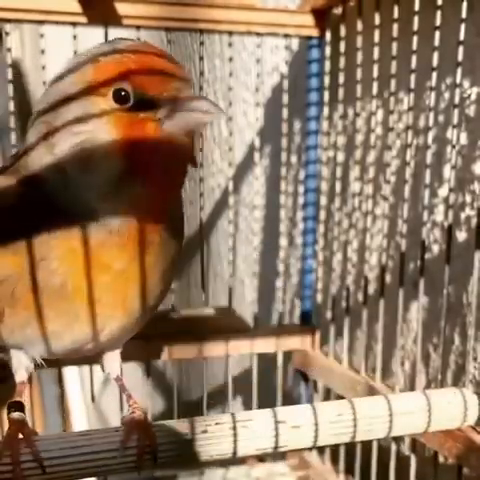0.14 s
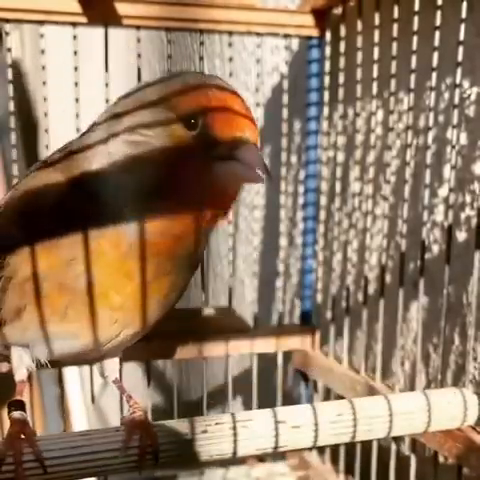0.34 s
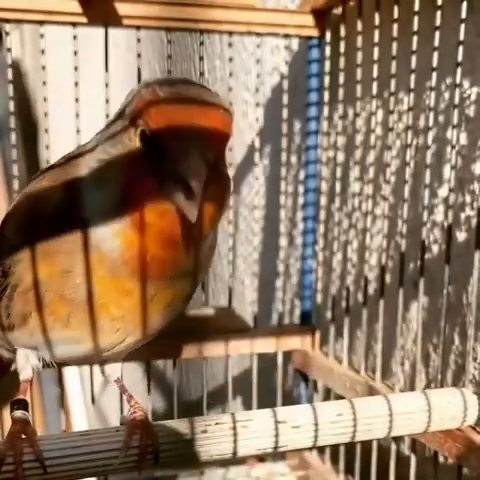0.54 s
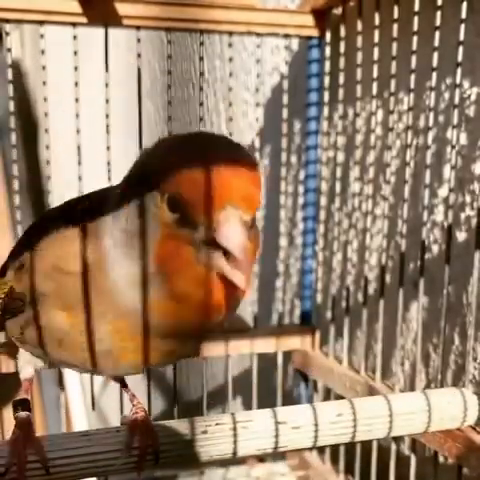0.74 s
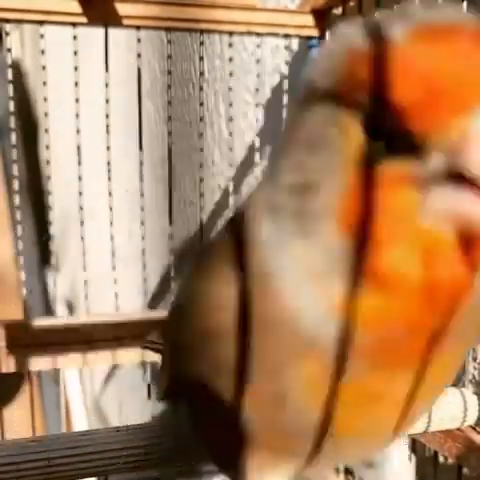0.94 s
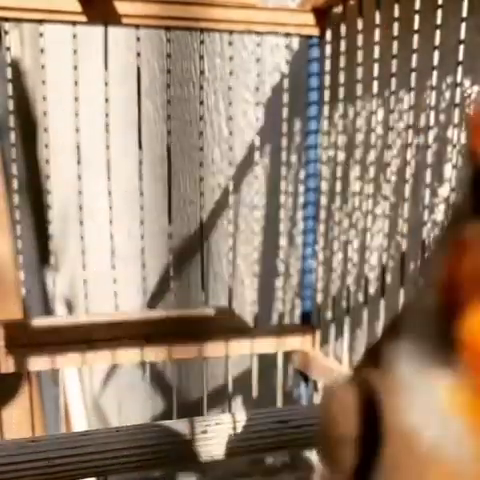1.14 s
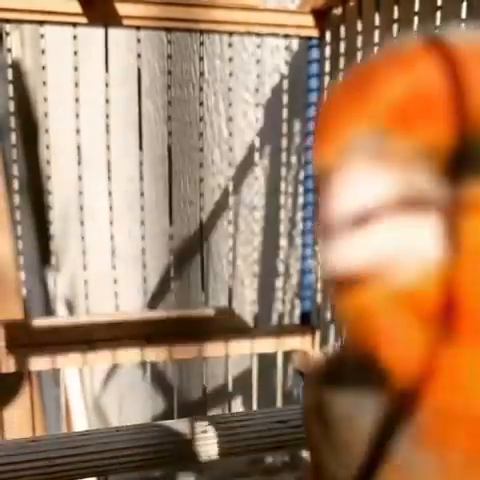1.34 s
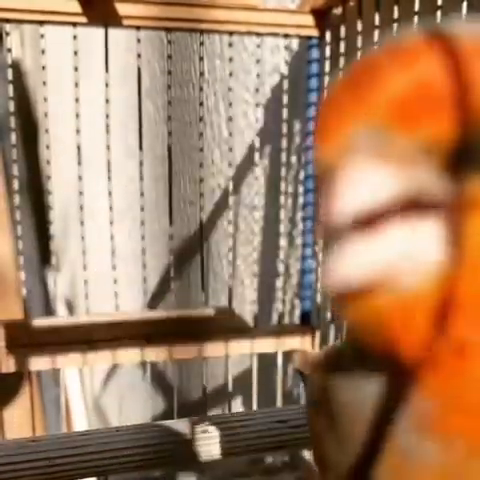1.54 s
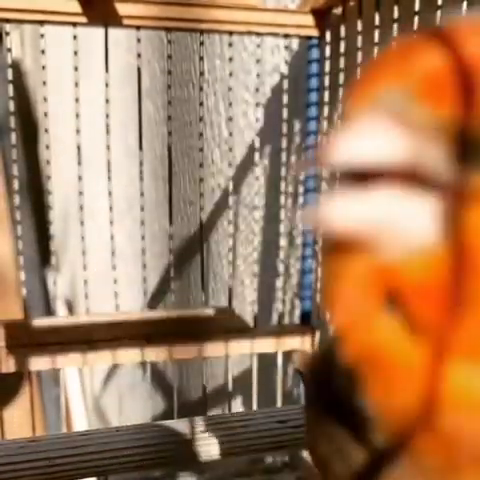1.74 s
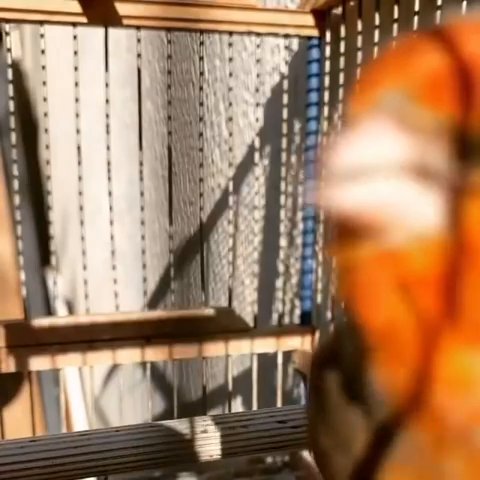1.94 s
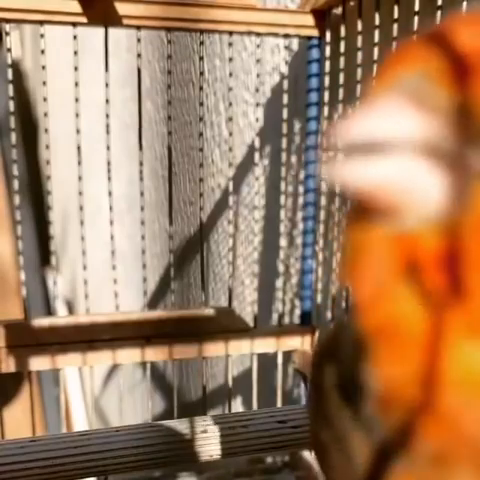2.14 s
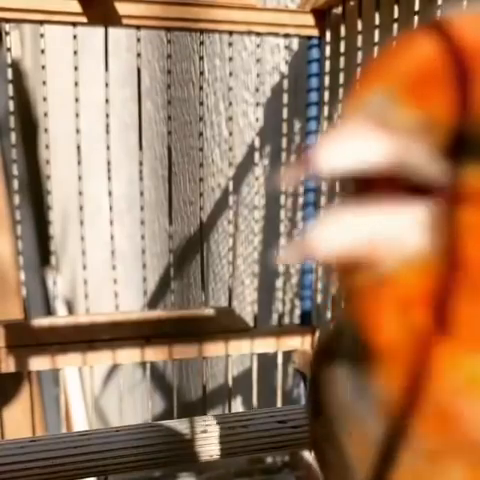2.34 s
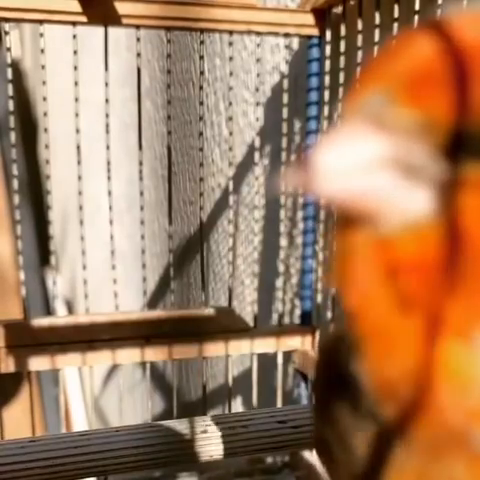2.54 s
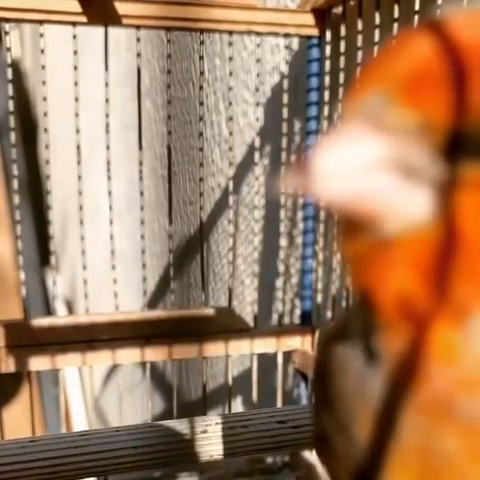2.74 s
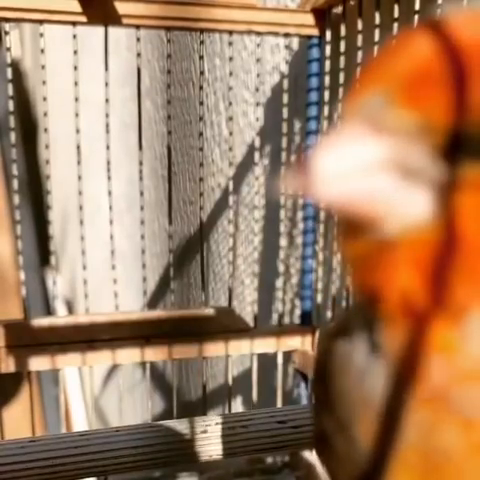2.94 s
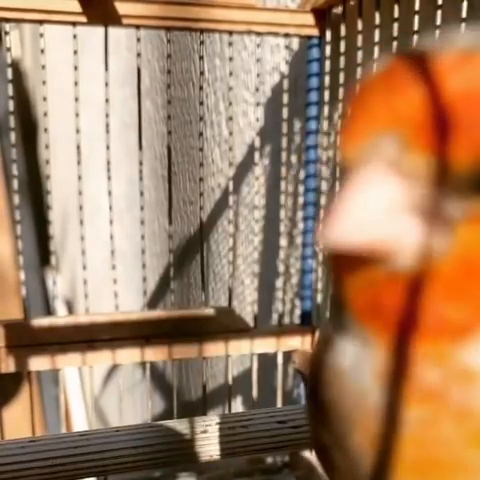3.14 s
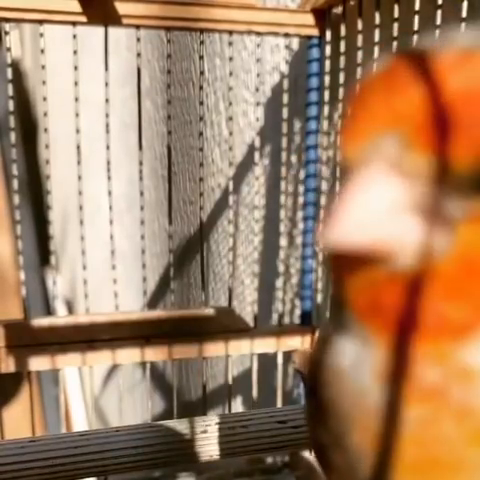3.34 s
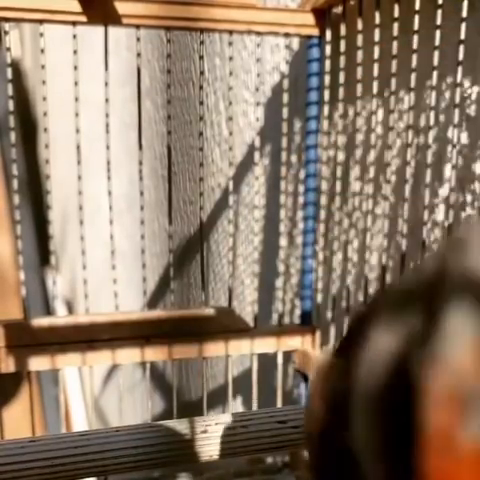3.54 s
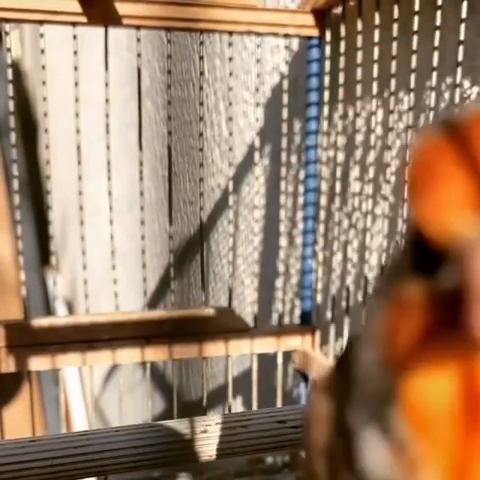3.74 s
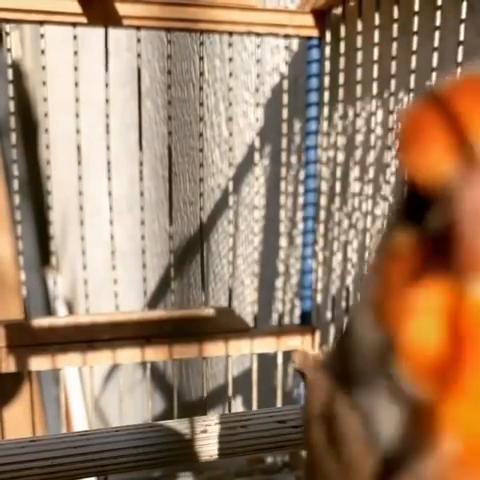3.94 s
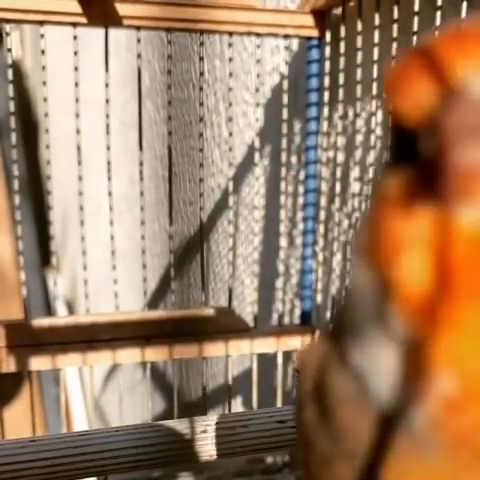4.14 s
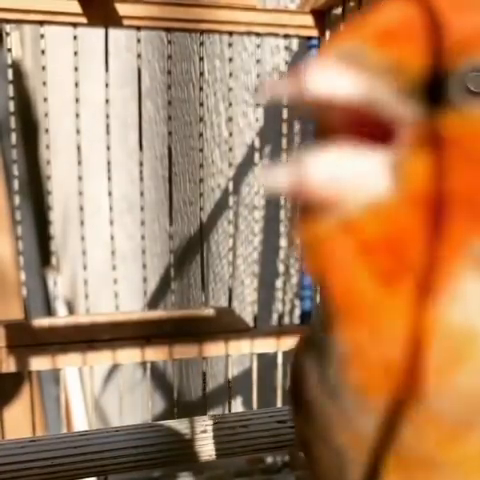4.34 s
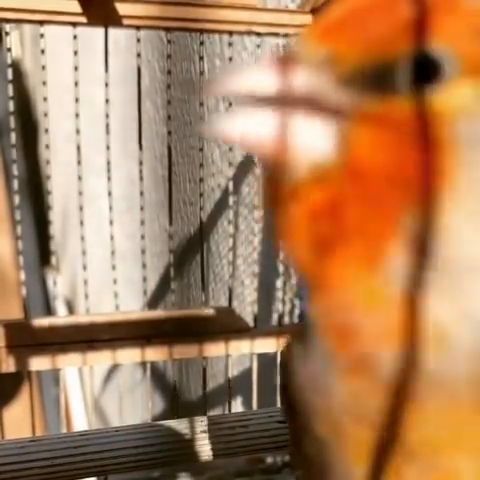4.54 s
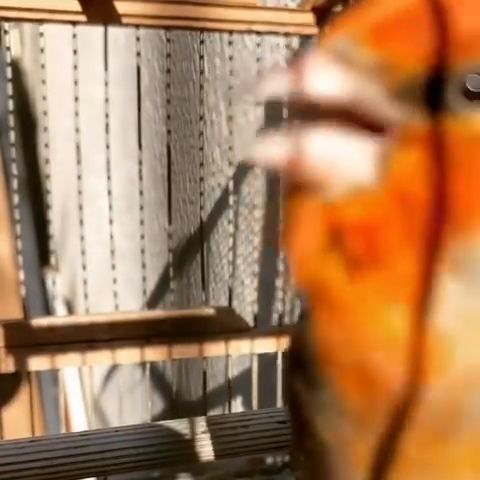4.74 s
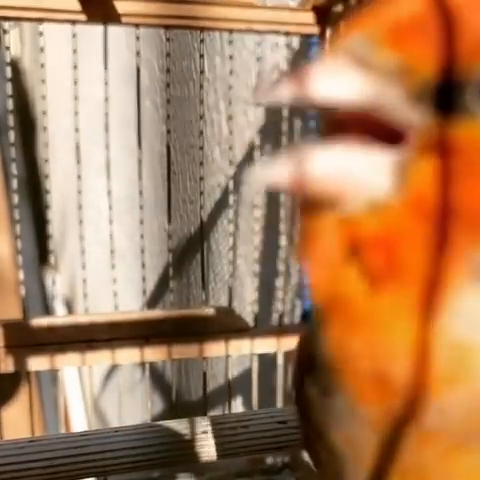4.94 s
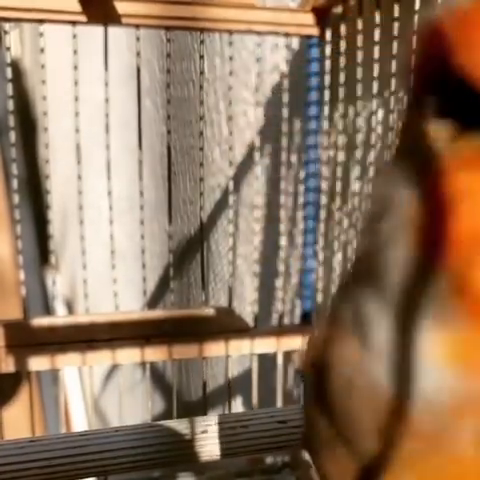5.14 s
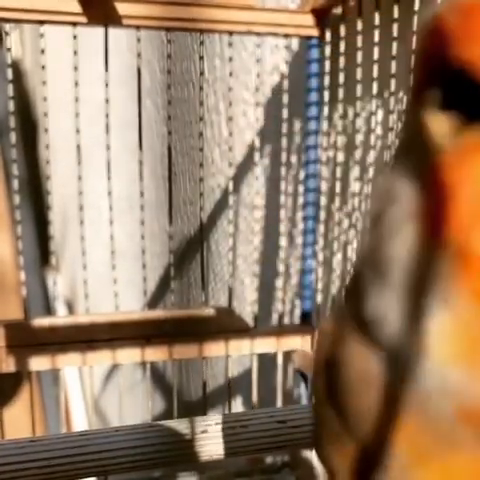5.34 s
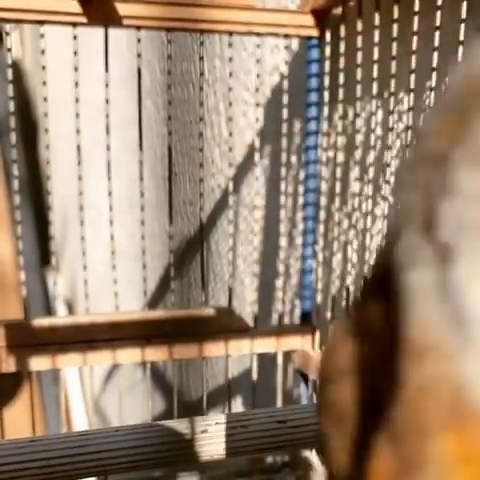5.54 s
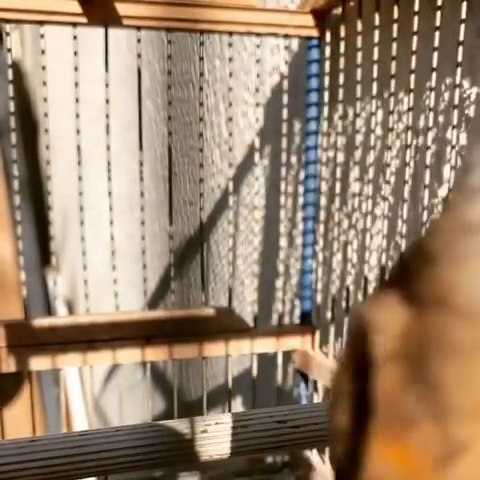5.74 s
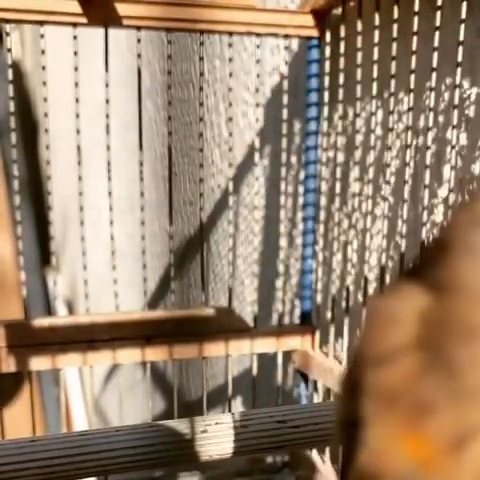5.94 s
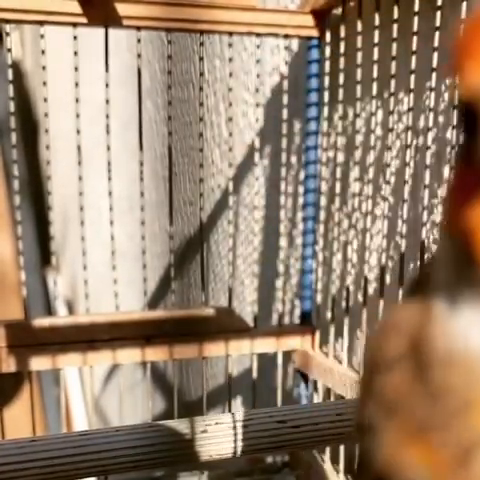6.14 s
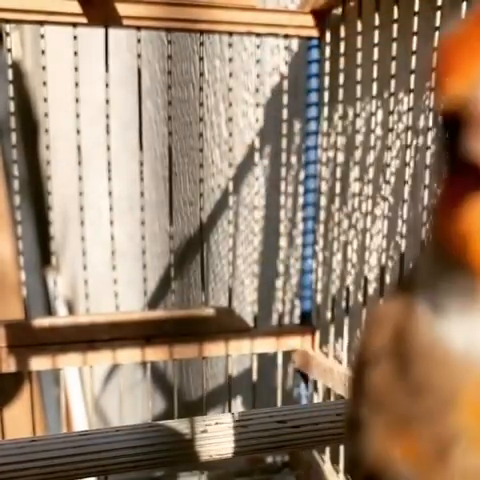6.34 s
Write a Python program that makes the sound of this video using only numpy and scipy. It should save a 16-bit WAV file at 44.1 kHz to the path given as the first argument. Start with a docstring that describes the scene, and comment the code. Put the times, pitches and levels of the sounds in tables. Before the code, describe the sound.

Two bursts of bright, high finch song, close and fairly dry with slight reflections. One begins at once with piping chirps and sliding whistles, then turns buzzy, raspy and squeaky before stopping. A gap leaves low air rumble and a thin distant bird whistle. The second starts with whistled chirps, quickens into a tight trill of about eight syllables, and ends in a dry rattling buzz. A far hoarse call closes.

```python
"""Outdoors, a small finch sings two phrases close to a phone, over a low rumble and a faint rustle.
Clear notes are near-sine voices on drawn pitch and level paths, with weak overtones and breath noise.
Buzzes throb in level and pitch; a harsh rasp stacks overtones in noise; a fast trill repeats three elements.
Far birds call faintly with more echo. Song and calls reach two microphone ports with a phase lead on the left."""
import sys
import numpy as np
from scipy import signal
from scipy.fft import rfft, irfft, next_fast_len
from scipy.io import wavfile
from scipy.ndimage import uniform_filter1d

SR = 44100
rng = np.random.default_rng(int(sys.argv[2]) if len(sys.argv) > 2 else 0)


def materialize(psi):
    """Save the field psi as 16-bit PCM at rate SR to the path in sys.argv[1].

    A 1-D psi becomes a single channel; in a 2-D psi each row is a channel.
    """
    bounded = np.clip(np.atleast_2d(psi).T, -1, 1)
    quanta = np.round(bounded * 32767).astype(np.int16)
    wavfile.write(sys.argv[1], SR, quanta)


N = 282240

# Outdoor noise spectrum. Each row: frequency in Hz, relative density in dB per Hz.
AIR_SPECTRUM = [(25, -24), (68, -4.5), (130, -20), (385, -25), (1200, -26.5), (2300, -34.5), (3000, -36.5),
                (14000, -54.5)]
# Slow course of the outdoor noise. Each row: time in seconds, rumble level in dB, rustle level in dB.
AIR_LEVELS = [(0, -63, -60.5), (0.899, -59.5, -69), (1.399, -73, -75), (3.7, -63, -74.5), (4.5, -70, -73.5),
              (6.4, -68.5, -76)]
# Likeness of outdoor noise at the ports. Each row: frequency in Hz, left-right correlation from -1 to 1.
AIR_LIKENESS = [(140, 1), (210, 0.79), (600, -0.5), (1300, -0.069)]
# Phase between the ports. Each row: frequency in Hz, left lead in radians.
PORT_LEAD = [(1300, .6), (2300, 1.5), (3790, 1.553), (6370, 6.01), (13900, 15.99)]

# Third and fourth partials. Each row: partial frequency in Hz, level re the tone in dB, before tilt and gape.
BEAK = [(5000, -42), (7500, -37.5), (10500, -21.5), (13000, -29.5)]
# Windpipe resonance on second partials. Each row: partial frequency in Hz, gain in dB at full strength.
WINDPIPE = [(6000, -28), (6650, -24), (7100, 7), (7500, -8), (11300, -9), (12500, -24)]
# Breath noise spectrum. Each row: frequency in Hz, relative level in dB.
BREATH_SPECTRUM = [(400, -22.5), (1500, -15), (3500, -1.5), (5300, -1.5), (7300, -4), (8900, 4),
                   (10500, 11), (13500, -20)]

# Note shapes. Each row: share of the note's length, offset from its pitch in Hz, offset from its level in dB.
# Note lists. Each row: start in seconds, length in seconds, pitch in Hz, level in dB,
# second partial in dB before the windpipe.
# Quick rise, a catch, a weak tail:
CHIRP = [(0, -450, -28.5), (.15, -230, -11.5), (.32, -10.5, 0), (.47, 119.5, -3), (.56, 313.5, -31),
         (.67, 225.5, -13), (1, 148, -31.5)]
CHIRP_NOTES = [(0.009, 0.048, 3554, -14.5, -30.5), (0.32, 0.051, 3520, -12, -40),
               (3.835, .042, 3552, -10.5, -42), (4.046, 0.047, 3550, -11, -61.5)]
# Rises, then keeps near its pitch while fading:
SCOOP = [(0, -700, -26.5), (.17, -280, -4.5), (.32, 7, -1.5), (.5, 155.5, -8), (.75, 78, -10),
         (1, 197.5, -32.5)]
SCOOP_NOTES = [(4.287, .037, 3573, -9, -52.5), (4.532, 0.032, 3618, -9.5, -47.5),
               (4.773, .036, 3590, -12.5, -77.5)]
# Low note between trill syllables:
LOW = [(0, -450, -19.5), (.15, -160, -5.5), (.32, -4, 0), (.62, 47, -9.5), (.75, 89, -7.5), (.9, 61.5, -13),
       (1, -40, -23)]
LOW_NOTES = [(4.958, 0.047, 3535, -16.5, -49.5), (5.077, 0.045, 3542, -16, -45),
             (5.195, 0.044, 3512, -15.5, -46.5), (5.312, 0.045, 3447, -17.5, -45),
             (5.432, 0.046, 3488, -18.5, -46), (5.556, 0.04, 3428, -19, -53),
             (5.677, 0.047, 3374, -23.5, -31.5)]
# Long climb with two swells:
GLIDE = [(0, -950, -25.5), (.32, -420, -8.5), (.43, -280, -11.5), (.63, -3, -1), (.8, 200, -11.5),
         (1, 353.5, -26)]
GLIDE_NOTES = [(0.523, 0.085, 3760, -10, -39), (0.739, 0.089, 3730, -13.5, -36),
               (0.964, 0.084, 3784, -10, -25)]
# Long climb that turns over at the end:
ARCH = [(0, -1150, -17), (.1, -750, 0.5), (.25, -440, -5), (.4, -330, 0), (.6, -70, -3.5), (.8, 7, -3),
        (.93, -50.5, -8), (1, -100, -17)]
ARCH_NOTES = [(1.184, 0.14, 3838, -20, 3.5), (1.465, 0.15, 3824, -20.5, -1)]
# Lead-in just under the dip:
PIP = [(0, -280, -18), (.65, 2.5, -2), (1, 45, -10.5)]
PIP_NOTES = [(0.431, 0.0059, 4616, -30.5, 4.5), (0.643, 0.0098, 4500, -25, -5.5),
             (.865, .014, 4530, -18, -14), (1.086, 0.012, 4460, -18, -21.5)]
# Sags and flicks up:
DIP = [(0, 373, -28), (.3, 164.5, -3.5), (.6, 38, -1), (.78, -31.5, -0.5), (.9, 114, -9.5), (1, 260, -26)]
DIP_NOTES = [(0.439, 0.026, 5020, -17, -1), (0.657, 0.026, 4920, -16, -12),
             (0.88, 0.021, 4890, -13.5, -14.5), (1.103, 0.02, 5025, -22, -5.5),
             (4.324, 0.031, 4803, -14.5, -13), (4.566, 0.028, 4774, -13.5, -19.5),
             (4.811, 0.03, 4780, -13.5, -16.5)]
# Level whistle:
HOLD = [(0, 116.5, -17.5), (.17, 10.5, -5.5), (.45, -2.5, 1), (.75, -2, -3), (.9, -61, 0), (1, 47.5, -14)]
HOLD_NOTES = [(0.114, 0.049, 5202, -13.5, -26.5), (3.629, 0.051, 5216, -17, -5),
              (3.939, 0.053, 5202, -19, -3.5), (4.434, 0.026, 5202, -27.5, 5),
              (4.682, 0.021, 5173, -22, -6)]
# Held whistle that slips down:
SAG = [(0, 412, -27.5), (.1, 257.5, -3.5), (.3, 64.5, -2), (.65, -39.5, -2), (.88, -120, -3), (1, -6.5, -1)]
SAG_NOTES = [(4.158, 0.052, 5304, -20.5, -4.5)]
# Steady fall:
DROP = [(0, 743.5, -28.5), (.25, 260.5, 4.5), (.5, 4.5, -1), (.75, -190, -1.5), (1, -260, -21.5)]
DROP_NOTES = [(0.223, 0.029, 4554, -30.5, -6.5), (3.74, 0.03, 4400, -19.5, -11)]
# Short high V:
TICK = [(0, 496.5, -17.5), (.35, -4, -3), (.6, 552.5, -9.5), (1, 1410.5, -14)]
TICK_NOTES = [(1.65, 0.0072, 6220, -8.5, -19.5), (1.936, 0.01, 6390, -14, -24)]
# Longer high V:
VEE = [(0, 1600, -23), (.2, 955.5, -11.5), (.35, 270, -1), (.47, 2.8, -2), (.72, 307.5, -4.5),
       (1, 770, -16)]
VEE_NOTES = [(1.678, .033, 6790, -14.5, -27.5), (1.965, 0.03, 6770, -16, -39)]
# Shoots up from below, breaks off, a weak afterthought:
SNAP = [(0, -2700, -38), (.15, -1400, -23), (.24, -500, 1), (.31, -100, -7), (.4, 4.5, -3), (.53, 59, -0.5),
        (.57, 59, -37), (.74, 102, -31.5), (.8, 125.5, -14), (1, 8.5, -27.5)]
SNAP_NOTES = [(1.362, 0.033, 4230, -12.5, -44.5)]
# Harsh, upward:
SWEEP = [(0, -2700, -27.5), (.25, -2600, -6.5), (.42, -1900, -4.5), (.63, 2, 1.5), (.85, 550, -6.5),
         (1, -200, -17.5)]
SWEEP_NOTES = [(4.412, 0.017, 6125, -19.5, -6.5), (4.658, 0.019, 6270, -23.5, -3)]
# Each row: shape, notes, breath noise per 250 Hz re the tone in dB.
KINDS = [
    (CHIRP, CHIRP_NOTES, -38), (SCOOP, SCOOP_NOTES, -39.5), (LOW, LOW_NOTES, -43),
    (GLIDE, GLIDE_NOTES, -40), (ARCH, ARCH_NOTES, -42), (PIP, PIP_NOTES, -51.5),
    (DIP, DIP_NOTES, -47.5), (HOLD, HOLD_NOTES, -53.5), (SAG, SAG_NOTES, -52),
    (DROP, DROP_NOTES, -49), (TICK, TICK_NOTES, -50), (VEE, VEE_NOTES, -54.5),
    (SNAP, SNAP_NOTES, -31.5), (SWEEP, SWEEP_NOTES, -29.5),
]

# Straight hoarse slurs from both sides of the syrinx. Each row: start in seconds, length in seconds,
# first pitch in Hz, last pitch in Hz, level in dB, breath noise per 250 Hz re the tone in dB.
SLUR_NOTES = [(2.237, 0.024, 3594, 3790, -16, -40), (2.238, 0.024, 2940, 3327, -21, -35),
              (2.432, 0.018, 4300, 4855, -31, -16), (2.451, 0.012, 5200, 6000, -16.5, -36),
              (2.465, .006, 6300, 6500, -25, -20), (2.468, 0.052, 3500, 3000, -36, -13),
              (4.44, .024, 3160, 3250, -45, -22), (2.493, 0.005, 3883, 3250, -24, -29.5),
              (2.521, 0.019, 3150, 3850, -14, -32.5), (2.542, 0.066, 4300, 2750, -27, -21),
              (2.569, 0.018, 6500, 5500, -21, -28), (2.59, 0.012, 4250, 4180, -28, -19.5),
              (2.575, 0.066, 2400, 1900, -37, -24), (.45, .068, 3550, 3150, -50, -21),
              (6.119, 0.0044, 3010, 1348, -42, -21.5)]
# Slur envelope. Each row: share of the length, offset from its level in dB.
SLUR_ENVELOPE = [(0, -14), (.3, -2), (0.55, -1), (1, -16)]

# Trill elements. Each row: seconds after the syllable start, pitch in Hz, level in dB before the repeat's gain.
# Upward flick:
FLICK = [(0, 3199, -44.5), (.006, 5000, -27.5)]
# High chip, then falling whistle:
CHIP_AND_WHISTLE = [
    [(0.005, 6036, -45), (0.009, 5694, -16.5), (0.015, 5654, -24)],
    [(0.016, 4547, -27.5), (0.022, 4400, -21), (0.038, 4238, -24), (0.047, 4430, -41.5)],
]
# Trill repeats. Each row: start in seconds, whistle gain in dB, flick and chip gain in dB.
TRILL_REPEATS = [(4.888, 5, -6.5), (5.004, 5.5, -5), (5.123, 6, -3.5), (5.242, 0.5, -1.5),
                 (5.361, 2.5, -1.5), (5.48, 1.5, -2), (5.603, 0, -4.5), (5.726, -4.5, -7)]
# Soft lead-in note. Each row: seconds after its start, pitch in Hz, level in dB.
GRACE = [(0, 2726, -37.5), (.007, 2899, -30), (0.01, 2950, -33.5)]
# Starts of the lead-in note in seconds.
GRACE_STARTS_S = [4.264, 4.507, 4.749]

# Buzz paths, one list per buzz. Each row: time in seconds, centre pitch in Hz, base level in dB.
BUZZ_PATHS = [
    [(1.743, 4766, -49), (1.76, 4763, -32), (1.78, 4685, -26.5), (1.815, 3909, -19.5), (1.848, 3077, -27),
     (1.884, 2800, -41), (1.893, 2650, -55)],
    [(1.73, 5600, -52), (1.75, 5500, -35), (1.778, 5200, -56)],
    [(5.808, 3440, -52), (5.83, 3483, -34), (5.86, 3276, -29.5), (5.918, 3166, -30.5), (5.924, 3140, -53.5)],
    [(5.922, 3100, -35.5), (5.94, 2280, -38.5), (6.04, 2195, -39), (6.116, 2290, -41)],
]
# Throbs, one row per buzz. Each row: mean throbs per second at the start, at the end, pitch swing in Hz,
# swing lag in radians at the start, at the end, depth from 0 to 1, sharpness as an exponent.
BUZZ_THROBS = [(206, 212, 390, .1, 3.8, .62, .8), (206, 208, 350, .35, .35, .85, 1.5),
               (166, 120, 80, .8, .8, .62, 1), (102.5, 81.5, -270, 1.4, 1.4, .88, 4.6)]
# Each row: second partial in dB before the windpipe, hiss re the base level in dB before the throb.
BUZZ_VOICES = [(-29, -38), (-30, -16), (-31, -50), (-90, -17)]

# Low rich stack. Each row: time in seconds, mean pitch in Hz, fundamental in dB, overtones in dB, mean noise in dB.
RASP_PATH = [(2.306, 1227, -61.5, -55, -55.5), (2.315, 1370, -51.5, -42.5, -34.5),
             (2.35, 1763, -44, -27, -36), (2.385, 2190, -36.5, -37.5, -44), (2.402, 2158, -49, -62, -61),
             (2.43, 2300, -35, -67, -50.5), (2.447, 2336, -58.5, -55, -56.5)]
# The rasp's second voice. Each row: time in seconds, pitch in Hz, level in dB.
RASP_TOP = [(2.336, 2945, -93), (2.376, 3738, -22.5), (2.394, 3810, -39)]

# Long thin far whistle. Each row: time in seconds, pitch in Hz, level in dB before its wavering.
FAR_WHISTLE = [(3.04, 2077, -76.5), (3.08, 2192, -76.5), (3.17, 2698, -87.5), (3.36, 2704, -78.5),
               (3.63, 2640, -78.5)]
# Hoarse far calls, one list each. Each row: time in seconds, pitch in Hz, level in dB before its wavering.
FAR_CALLS = [
    [(2.722, 2910, -95), (2.742, 3650, -69), (2.755, 3800, -89)],
    [(6.233, 2946, -96), (6.32, 4190, -66), (6.4, 4620, -77)],
]

TOP_HZ = 14270
GAPE = 0.22  # dB the third and fourth partials gain per dB of the second
LEAD_S, CATCH_S, CATCH = .006, .005, .3  # a note creeps in, and shakes until the voice has caught
WAVER = .035  # share of pitch shake in the hoarsest notes
TREMBLE_HZ, TREMBLE = 135, .22  # whistles in held and dipping shapes shiver in level
SLUR_SECOND_DB = -33
AGAIN_S = .281  # the first two buzzes, both sides of the syrinx together, repeat after this
ROUGH = .09  # base weight of random level shake in a buzz
FRAY = .022  # added shake per dB a buzz lies under its peak


def amp(db):
    """Decibels to amplitude."""
    return 10 ** (np.asarray(db) / 20)


def unit(x):
    """Scale to rms 1."""
    return x / np.sqrt(np.mean(x ** 2) + 1e-20)


def along(points, hz):
    """Interpolate (Hz, value) points on a log axis."""
    f, v = np.transpose(points)
    return np.interp(np.log(hz + 1), np.log(f + 1), v)


def filtered(x, response):
    """Multiply the spectrum of x by a response of frequency."""
    m = next_fast_len(N + 8192)
    return irfft(rfft(x, m) * response(np.fft.rfftfreq(m, 1 / SR)), m)[..., :N]


def span(rows, start_s=0):
    """Sample numbers covered by the rows, and each column along them."""
    time_s, *columns = np.transpose(rows)
    first = round((start_s + time_s[0]) * SR)
    last = min(N, round((start_s + time_s[-1]) * SR))
    at = np.arange(first, last)
    return at, [np.interp(at / SR - start_s, time_s, c) for c in columns]


def flutter(hz):
    """Random wavering of rms 1, mostly below hz."""
    return unit(filtered(rng.standard_normal(N), lambda f: 1 / (1 + (f / hz) ** 2) ** 2))


def outdoors():
    """Rumble alike at both ports below 220 Hz; rustle above it turns unrelated or opposed."""
    def turn(f):
        return np.arccos(np.clip(along(AIR_LIKENESS, f), -1, 1)) / 2

    bands = [lambda f: f < 220, lambda f: f >= 220]
    out = 0
    for band, db in zip(bands, span(AIR_LEVELS)[1]):
        def mid_side(f):
            return amp(along(AIR_SPECTRUM, f)) * band(f) * [np.cos(turn(f)), np.sin(turn(f))]

        mid, side = filtered(rng.standard_normal((2, N)), mid_side)
        held_db = np.pad(db, (0, N), mode="edge")[:N]
        level = amp(held_db + 1.5 * flutter(0.74))
        out = out + level * unit(np.array([mid + side, mid - side]))
    return out


def partials(hz, second_db, grit, windpipe=1):
    """A near-sine voice, about rms 1; its weak overtones waver with grit."""
    phase = 2 * np.pi * np.cumsum(hz) / SR
    upper = 0
    for k in (3, 4):
        upper_db = along(BEAK, k * hz) - 10 * (k - 2.5) + GAPE * (second_db + 53.5)
        upper = upper + amp(upper_db) * (k * hz < TOP_HZ) * np.sin(k * phase)
    second_level = amp(second_db + windpipe * along(WINDPIPE, 2 * hz)) + amp(-41.5)
    second = second_level * (2 * hz < TOP_HZ) * np.sin(2 * phase)
    smear = np.clip(second_db / 22, -1, 0) ** 2  # the weaker the partial, the rougher
    return np.sqrt(2) * (np.sin(phase) + second * (1 + smear * grit) + upper * (1 + .5 * grit))


def add_note(tone, air, rows, second_db, breath_db, grit, start_s=0, gain_db=0, tremble=0):
    """Pressure swells in, runs in straight lines and dies away; the breath level follows it."""
    fade_s = 0.0015
    (s0, f0, db0), (s1, f1, _) = rows[0], rows[-1]
    creep_s = min(LEAD_S, 0.17 * (s1 - s0))
    path = [(s0 - fade_s - creep_s, f0, 0), (s0 - fade_s, f0, 0.5 * amp(db0 + gain_db))]
    path += [(s, f, amp(db + gain_db)) for s, f, db in rows]
    path += [(s1 + fade_s, f1, 0)]
    at, (hz, level) = span(path, start_s)
    hz = uniform_filter1d(hz, round(0.003 * SR))  # the syrinx rounds off corners in pitch
    level = level * (1 + tremble * np.sin(2 * np.pi * TREMBLE_HZ * at / SR))
    hoarse = np.clip(amp(breath_db + 17), 0, 1)  # breathy notes shake
    hz = hz * (1 + WAVER * hoarse * grit[::-1][at])
    age_s = np.clip(at / SR - start_s - s0, 0, 1)
    shake = hoarse + CATCH * np.exp(-age_s / CATCH_S)
    tone[at] += level * (1 + shake * grit[at]) * partials(hz, second_db, grit[at])
    air[at] += level * amp(breath_db)


def breath_noise():
    """Turbulence, coming in patches of time and pitch."""
    breath = unit(filtered(rng.standard_normal(N), lambda f: amp(along(BREATH_SPECTRUM, f))))
    z = signal.stft(breath)[2]
    clumps = uniform_filter1d(rng.standard_normal(z.shape), size=5, axis=0)
    clumps = uniform_filter1d(clumps, size=7, axis=1)
    return unit(signal.istft(z * amp(6 * unit(clumps)))[1][:N])


def whistles():
    """Clear notes, slurs, trill and the rasp's top voice, slightly unsteady in pressure."""
    tone, air, grit = np.zeros(N), np.zeros(N), flutter(420)
    for shape, notes, breath_db in KINDS:
        tremble = TREMBLE * (shape in (HOLD, SAG, DIP))
        for start_s, length_s, hz, db, second_db in notes:
            rows = [(u * length_s, hz + offset_hz, fall_db) for u, offset_hz, fall_db in shape]
            add_note(tone, air, rows, second_db, breath_db, grit, start_s, db, tremble)
    for start_s, length_s, hz0, hz1, db, breath_db in SLUR_NOTES:
        rows = [(u * length_s, hz0 + u * (hz1 - hz0), fall_db) for u, fall_db in SLUR_ENVELOPE]
        add_note(tone, air, rows, SLUR_SECOND_DB, breath_db, grit, start_s, db)
    chip, fall = CHIP_AND_WHISTLE
    for start_s, whistle_db, chip_db in TRILL_REPEATS:
        add_note(tone, air, FLICK, -21, -30.5, grit, start_s, chip_db)
        add_note(tone, air, chip, -12.5, -37.0, grit, start_s, chip_db)
        add_note(tone, air, fall, -11.5, -46.0, grit, start_s, whistle_db)
    for start_s in GRACE_STARTS_S:
        add_note(tone, air, GRACE, -15, -48, grit, start_s)
    add_note(tone, air, RASP_TOP, -15, -45, grit)
    tone *= 1 + .04 * flutter(300)
    return tone + np.sqrt(10000 / 250) * air * breath_noise()  # breath per 250 Hz to 10 kHz


def buzzes():
    """A second slow oscillation throbs the level and swings the pitch."""
    out, grit, beat = np.zeros(N), flutter(290), flutter(200)
    # broad hiss around 3.5 kHz
    hiss = unit(filtered(rng.standard_normal(N), lambda f: f ** 3 / (1 + (f / 3700) ** 4) ** 1.9))
    sung = list(zip(BUZZ_PATHS, BUZZ_THROBS, BUZZ_VOICES))
    timed = [(buzz, s) for buzz in sung[:2] for s in (0, AGAIN_S)]
    timed += [(buzz, 0) for buzz in sung[2:]]
    for (rows, throbs, (second_db, hiss_db)), start_s in timed:
        rate0, rate1, swing_hz, lag0, lag1, depth, sharp = throbs
        at, (hz, db) = span(rows, start_s)
        rate = np.linspace(rate0, rate1, len(at)) * (1 + .02 * beat[at])
        cycle = 2 * np.pi * np.cumsum(rate) / SR
        throb = 1 - depth + 2 * depth * ((1 - np.cos(cycle)) / 2) ** sharp
        # the swing can slip against the throb late in the buzz
        lag = lag0 + (lag1 - lag0) * np.linspace(0, 1, len(at)) ** 3
        hz = hz + swing_hz * np.cos(cycle - lag)
        shake = (ROUGH + FRAY * (db.max() - db)) * grit[at]
        voice = partials(hz, second_db, grit[at], windpipe=0.49) * (1.5 + shake)
        out[at] += amp(db) * (throb * voice + (.5 + throb) * amp(hiss_db) * hiss[at])
    return out


def rasp():
    """Uneven pulses give a smeared stack of overtones in noise."""
    out = np.zeros(N)
    at, (hz, db, upper_db, noise_db) = span(RASP_PATH)
    phase = 2 * np.pi * np.cumsum(hz * (1 + .03 * flutter(500)[at])) / SR
    stack = sum(np.sin(k * phase) * k ** -.6 for k in range(2, 8))
    noise = unit(filtered(rng.standard_normal(N), lambda f: (f > 2600) / (1 + (f / 7000) ** 2)))
    noise = noise[at] * amp(2.7 * flutter(150)[at])
    out[at] = np.sqrt(2) * (amp(db) * np.sin(phase) + amp(upper_db) * stack) + amp(noise_db) * noise
    return out


def far_birds():
    """A thin wavering whistle, and hoarse calls smeared over a wide band by fast random shake."""
    whistle, hoarse, grit = np.zeros(N), np.zeros(N), flutter(360.6)
    no_air = np.zeros(N)  # their breath noise is left out
    add_note(whistle, no_air, FAR_WHISTLE, -40, -60, grit)
    for call in FAR_CALLS:
        add_note(hoarse, no_air, call, -40, 0, grit)
    return whistle * np.clip(.8 + .8 * flutter(25), 0, 2) + hoarse * (.7 + .7 * grit)


def echoes(x, t60_s, level_db, corner_hz):
    """Diffuse reflections as decaying noise tails, different at each port, duller above the corner."""
    t = np.arange(round(.3 * SR)) / SR
    tail = rng.standard_normal((2, len(t))) * amp(-60 * t / t60_s) * (t > .004)
    wet = signal.fftconvolve(x[None], tail / np.linalg.norm(tail[0]), axes=1)[:, :N]
    return amp(level_db) * filtered(wet, lambda f: 1 / (1 + (f / corner_hz) ** 2))


def ports(x):
    """Split the phase lead evenly: left forward, right back."""
    def response(f):
        lead = np.interp(f, *np.transpose(PORT_LEAD))
        return np.exp(.5j * lead * np.array([[1], [-1]]))

    return filtered(x, response)


def scene():
    """Song and far birds through the ports, two echo tails, outdoor noise."""
    song = whistles() + buzzes() + rasp()
    far = far_birds()
    blur = .5 + flutter(600)  # fast random level shake roughens and blurs the song's reflections
    wet = blur * song + 10 * far  # far birds are heard mostly by reflection
    short_echo = echoes(wet, 0.075, -21, 27000)
    long_echo = echoes(wet, 0.53, -38, 9000)
    return ports(song + far) + short_echo + long_echo + outdoors()


def record(dry):
    """The phone keeps nothing above its band limit."""
    return filtered(dry, lambda hz: hz < TOP_HZ)


dry = scene()
out = record(dry)
materialize(out)
```